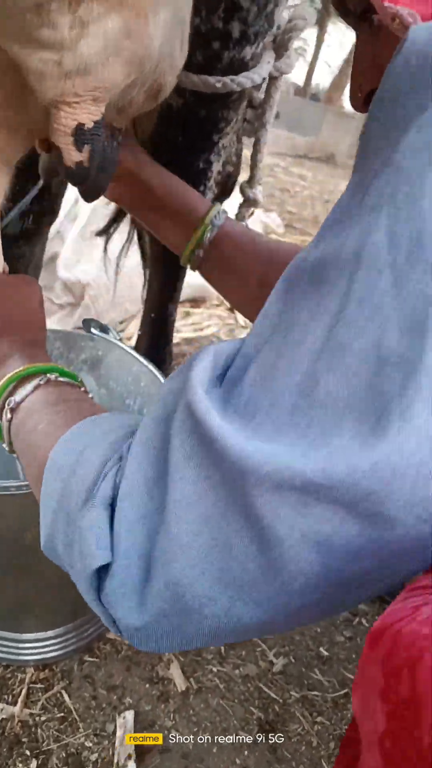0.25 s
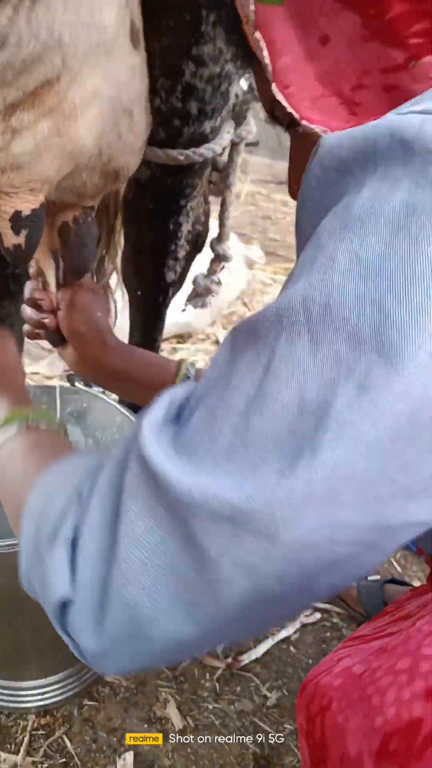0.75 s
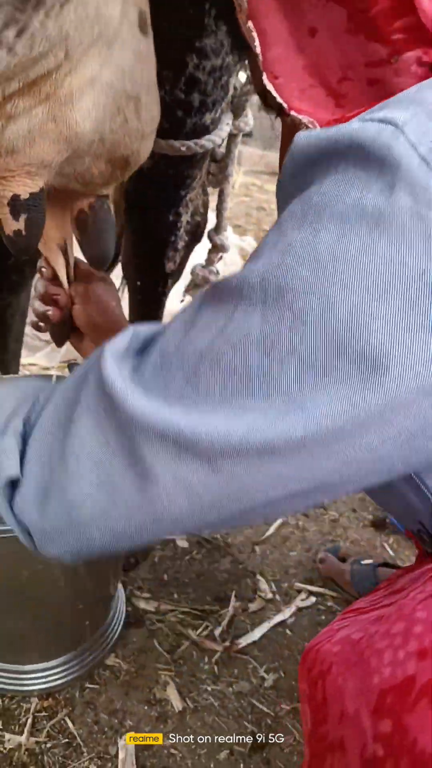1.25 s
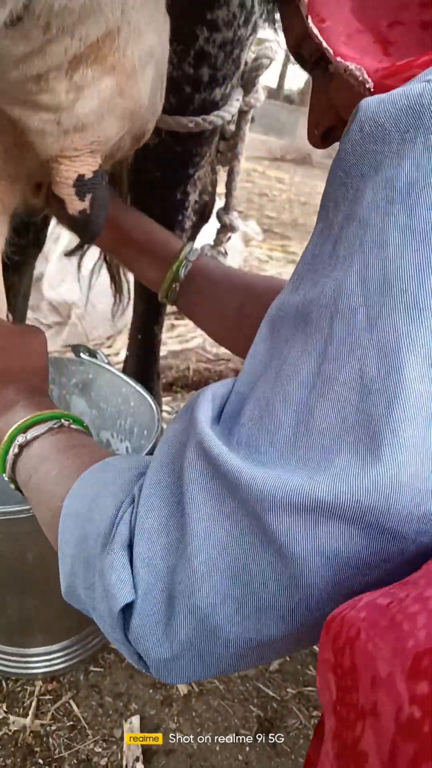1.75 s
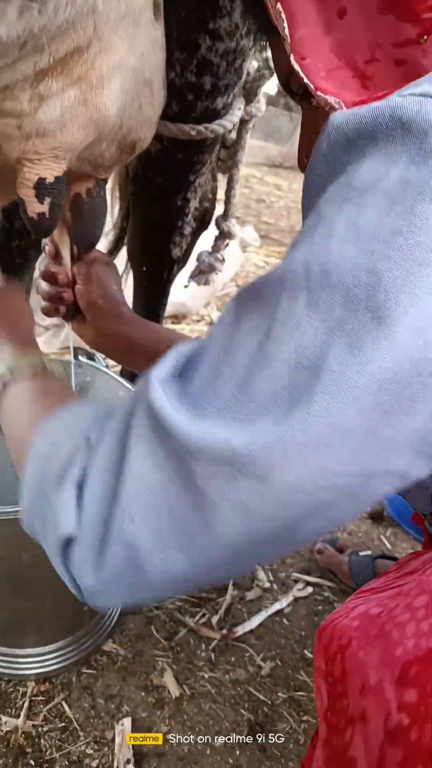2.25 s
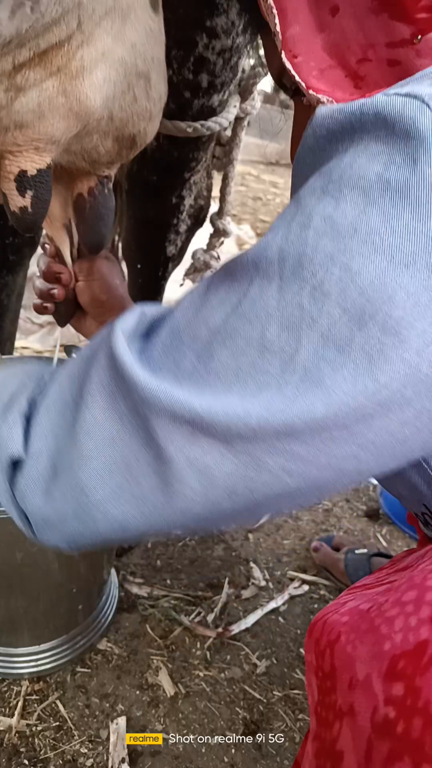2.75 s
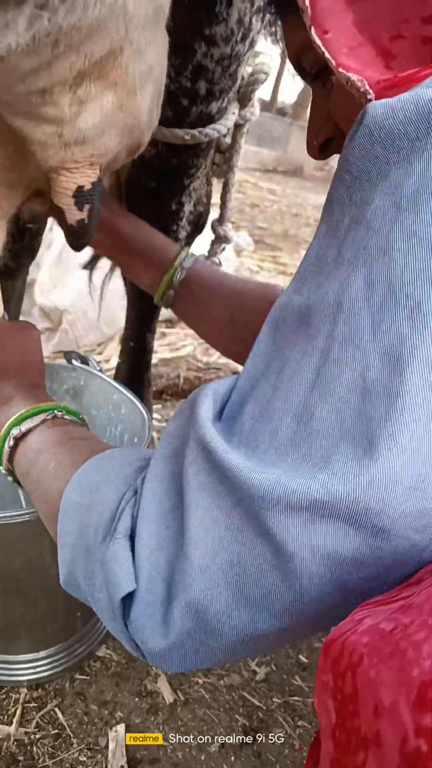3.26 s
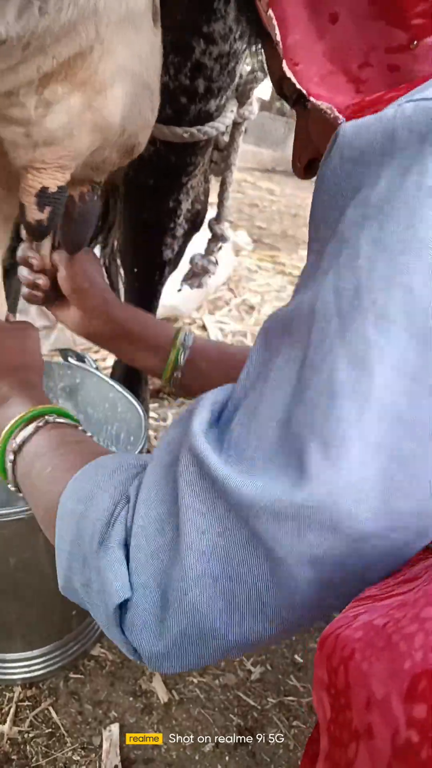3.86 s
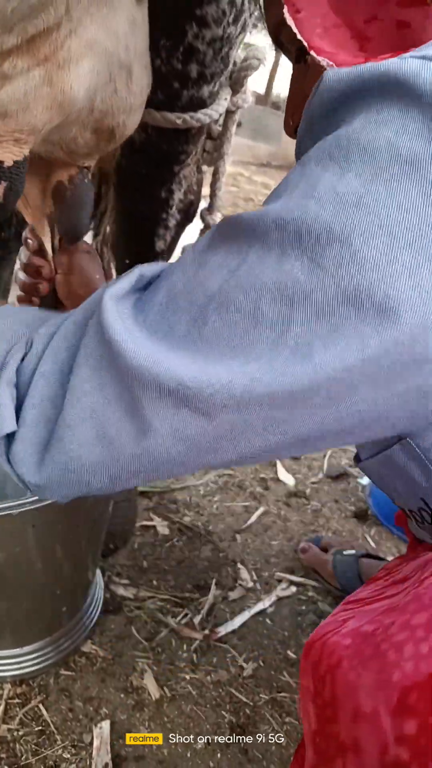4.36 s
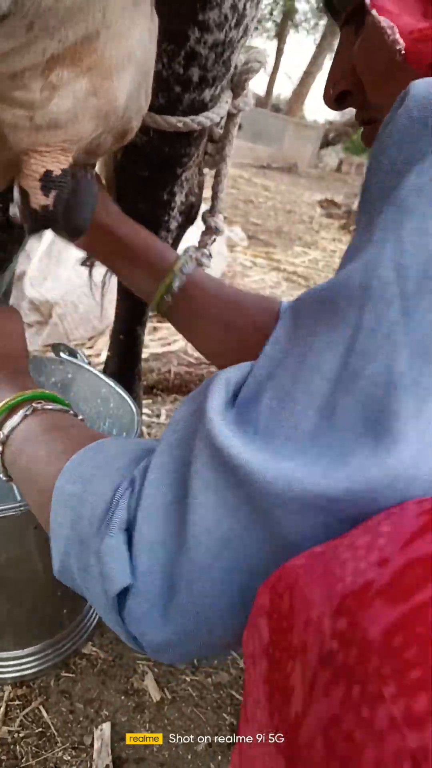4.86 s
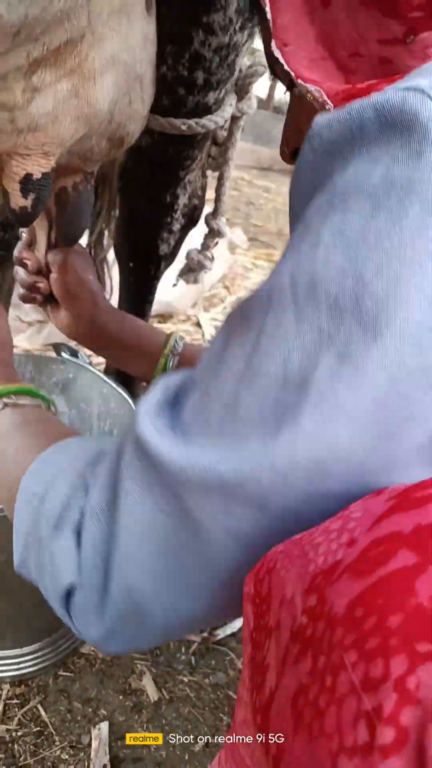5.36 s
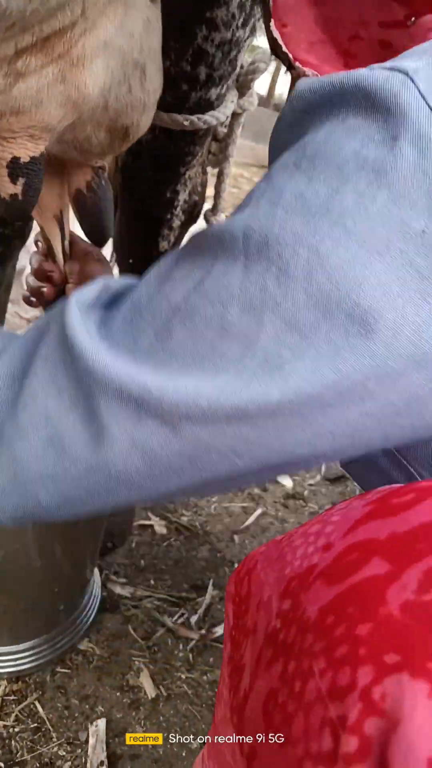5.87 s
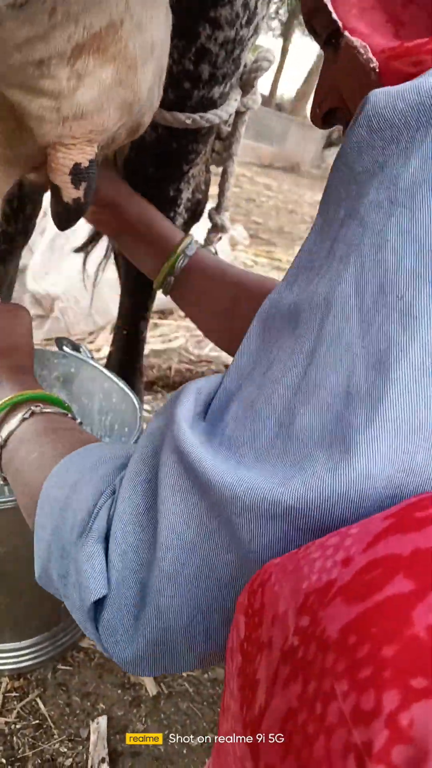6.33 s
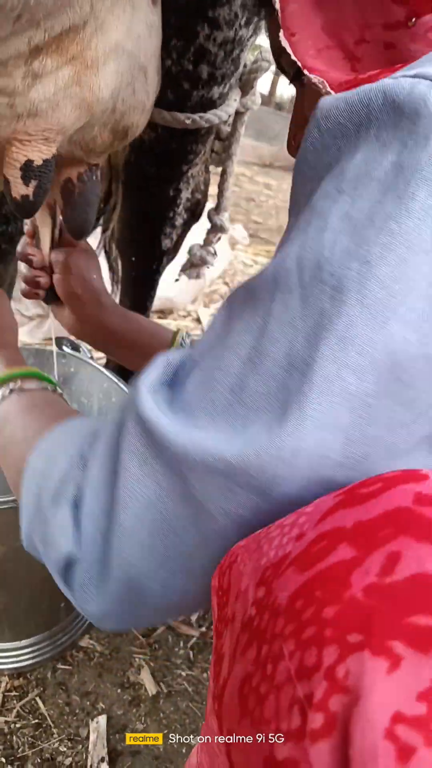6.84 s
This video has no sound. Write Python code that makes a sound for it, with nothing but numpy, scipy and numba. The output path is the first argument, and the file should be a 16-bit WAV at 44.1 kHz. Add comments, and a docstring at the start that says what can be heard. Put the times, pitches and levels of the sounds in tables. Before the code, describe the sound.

Hand milking up close: quick regular squirts plunge into frothy milk in a metal bucket, each a sharp hiss followed by wet, ringing bubbles.

```python
"""Jets of milk plunge into a part-filled steel pail as a cow is milked by hand, a slow and a quick hand in turn.
Each jet hisses on the froth (noise, fizzing and ticking bubbles), then drags air under (clouds of decaying sines).
Big bubbles gulp, single ones ring out, foam pockets sing; resonators and short echoes make the pail.
Behind it lie one soft low bump and the rumble of a quiet farmyard; a phone close by hears it all."""
import sys
import numpy as np
from scipy import signal
from scipy.fft import rfft, irfft
from scipy.io import wavfile
from scipy.ndimage import uniform_filter1d, minimum_filter1d, map_coordinates
from numba import njit

SR = 44100
rng = np.random.default_rng(int(sys.argv[2]) if len(sys.argv) > 2 else 0)


def master_out(mix):
    """Clip the mix to full scale and print it as 16-bit PCM to the path in sys.argv[1]."""
    frames = np.transpose(np.atleast_2d(mix))
    ceiling = np.clip(frames, -1, 1)
    pcm = np.round(ceiling * 32767).astype(np.int16)
    wavfile.write(sys.argv[1], SR, pcm)


N = 313110
T = np.arange(N) / SR

# Pulls of a teat, slow and quick hand in turn, each until the next. Each row: start in seconds,
# relative spray level in dB, grip time in seconds, relative fizz level in dB, fizz peak after start in seconds,
# stream level in dB, bubble pitch in Hz, pitch sag in octaves per second.
PULLS = [(-0.3, -55, 0.26, -36, 0.11, -26, 1455, 0.7), (0.076, -48.5, 0.25, -36, 0.11, -30.5, 2043, 1.3),
         (0.429, -46.5, 0.26, -33.5, 0.017, -21.5, 2172, 2.5),
         (0.83, -50.0, 0.16, -41, 0.14, -35.5, 1870, 0.5),
         (1.188, -47.5, 0.25, -40, 0.038, -26, 1914, -0.2),
         (1.588, -50.5, 0.1, -42, 0.088, -34.5, 1790, 1.1),
         (1.959, -46.5, 0.21, -43, 0.18, -27.5, 1950, 1.16),
         (2.352, -50.5, 0.19, -37.5, 0.15, -31.5, 1930, 1.5),
         (2.698, -46, 0.25, -36, 0.13, -25, 2130, 1.65), (3.088, -47, 0.17, -38, 0.2, -29.5, 1676, 0),
         (3.464, -46, 0.19, -38.5, 0.055, -23, 1733, 1.53),
         (3.86, -49.5, 0.15, -37.0, 0.16, -32, 1923, 3.05),
         (4.228, -44.5, 0.23, -37.5, 0.086, -24, 1834, 1.36),
         (4.638, -50.5, 0.15, -40.5, 0.13, -33.5, 1940, 0.9),
         (5.006, -48, 0.12, -43, 0.094, -33.5, 1645, 0), (5.41, -52.5, 0.24, -43.5, 0.17, -34, 1695, -0.25),
         (5.78, -51, 0.37, -40, 0.15, -32, 1920, 2), (6.173, -52.5, 0.14, -38.5, 0.05, -34, 1690, -0.6),
         (6.542, -48.5, 0.23, -38.5, 0.13, -27.5, 2074, 2),
         (6.931, -52.5, 0.2, -40.5, 0.14, -31.5, 1930, 1.2)]
# Colour of foam fizz. Each row: frequency in Hz, gain in dB.
FIZZ_COLOUR = [(60, -67), (300, -61), (1000, -25), (2400, 9.5), (2900, 10), (4000, 5), (6000, 0.5),
               (7500, -4), (12000, -28)]
# Colour of jet spray. Each row: frequency in Hz, gain in dB.
SPRAY_COLOUR = [(60, -35), (300, -17), (1500, -9.5), (5000, 5), (7600, -1), (9000, 1), (10500, -5.5),
                (12500, -5), (16000, -8.5)]


def plunge(now, plunge_gain_db=-.5, clump_db=2.5, clump_per_s=240, surge_db=1, surge_per_s=45):
    """The stream bubbles, sagging in pitch as it slows; plunges drag air under, adding swells of bubbles."""
    # Stream peak after the pull starts, in seconds: slow hand, quick hand.
    stream_peak_s = (0.28, 0.29)
    # Stream rise in dB per second: slow hand, quick hand.
    stream_rise_db_per_s = (32.5, 17)
    # Stream fall in dB per second: slow hand, quick hand.
    stream_fall_db_per_s = (160, 86)
    # Jets breaking through the froth. Each row: middle in seconds, relative level in dB,
    # length in seconds, bubble pitch in Hz.
    plunges = [(0.21, -13, 0.038, 2045), (0.297, -22.5, 0.034, 2034), (0.645, -21, 0.017, 2070.0),
               (0.776, -22.5, 0.079, 1513), (0.942, -18, 0.028, 1980), (0.995, -16, 0.019, 1555),
               (1.064, -27.5, 0.036, 1193), (1.268, -21, 0.014, 2114), (1.357, -21.5, 0.026, 2010),
               (1.42, -24, 0.037, 1620), (1.574, -28, 0.034, 1320), (1.701, -13.5, 0.045, 2030),
               (2.096, -26.5, 0.085, 1934), (2.163, -18, 0.035, 1756), (2.354, -31, 0.0081, 2040),
               (2.488, -21, 0.051, 1850), (2.78, -22.5, 0.017, 1976), (2.912, -22.5, 0.056, 1340),
               (3.066, -28, 0.042, 1360), (3.251, -20.5, 0.089, 1706), (3.561, -20, 0.017, 2140),
               (3.704, -20.5, 0.053, 2010.0), (3.978, -16, 0.037, 1835), (4.021, -18.5, 0.016, 2270),
               (4.448, -18.5, 0.045, 1732), (4.761, -16, 0.031, 1900), (4.827, -26.5, 0.04, 2110),
               (5.09, -21.5, 0.059, 1566), (5.195, -18, 0.052, 1587), (5.408, -36, 0.022, 1910),
               (5.526, -21, 0.049, 1903), (5.86, -21, 0.015, 2034), (5.953, -26.5, 0.08, 1926),
               (6.133, -29, 0.054, 1684), (6.3, -17.5, 0.04, 1827), (6.593, -28, 0.024, 1770),
               (6.729, -24.5, 0.063, 1600), (7.064, -16, 0.047, 1840)]
    # Colour of plunge bubbles. Each row: frequency in Hz, gain in dB.
    plunge_colour = [(60, -59), (200, -57), (500, -13.5), (730, -13.5), (880, 2), (1300, -3), (1800, -2),
                     (2330, -3), (2550, -9), (3200, -5.5), (5000, -32), (12000, -51)]
    sag_after_s, plunge_sag_octaves_per_s, plunge_sag_s = 0.095, 3.26, 0.065

    age, hand = now["age"], now["hand"]
    since_peak_s = age - np.take(stream_peak_s, hand)
    stream_db = now["stream_db"] + swell(since_peak_s, hand, stream_rise_db_per_s, stream_fall_db_per_s)
    stream_hz = now["hz"] * 2 ** (-now["sag"] * np.maximum(age - sag_after_s, 0))
    parts = [(catching(stream_db), stream_hz)]
    for middle_s, db, length_s, hz in plunges:
        shape = np.exp(1 - np.sqrt(1 + (2 * (T - middle_s) / length_s) ** 2))
        # pitch falls as the hole deepens
        sag = np.exp2(-plunge_sag_octaves_per_s * np.clip(T - middle_s, -plunge_sag_s, plunge_sag_s))
        parts.append((amp(db + plunge_gain_db) * shape, hz * sag))
    strength, pitch_hz = blend(parts)
    bubbles = cloud(pitch_hz, per_s=2600, octaves=0.3166, cycles=47.4, scatter_db=3.0, glide=0.077, pinch=0.18)
    clumps = amp(clump_db * walk(clump_per_s))
    shaped = even(pail(colour(bubbles * clumps, plunge_colour)), span_s=0.031)
    surge = amp(surge_db * walk(surge_per_s))
    return shaped * strength * catching(running_dry()) * surge


def spray(now, gain_db=4.0, sputter_db=2, sputter_per_s=120, patter_db=4.0,
          strike_db=16.5, strike_s=0.0077, surge_db=3.0, surge_per_s=30):
    """Jet droplets patter on the foam as spiky noise; the head strikes hardest, easing grip fades it."""
    head_db = strike_db * np.exp(-now["age"] / strike_s)
    level_db = now["spray_db"] + head_db + easing(now) + surge_db * walk(surge_per_s)
    patter = amp(patter_db * np.minimum(rng.exponential(size=N), 6))
    coloured = pail(colour(rng.standard_normal(N) * patter, SPRAY_COLOUR))
    shaped = hollows(coloured, depth_db=6.0, per_octave=21, per_s=36, sink_octaves_per_s=0.2)
    sputter = amp(gain_db + sputter_db * walk(sputter_per_s))
    return even(shaped, span_s=0.063) * catching(level_db) * sputter


def droplets(now, per_s=140, gain_db=1, scatter_db=4, decay_s=0.0012):
    """Stray drops tick on froth and wall as short noise decays, fading once the grip eases."""
    # Colour of stray drops. Each row: frequency in Hz, gain in dB.
    droplet_colour = [(200, -37), (1500, -7), (3000, -0.5), (5500, -2), (9000, -9.5), (16000, -20)]
    wait, size = rng.exponential(size=(3000, 2)).T
    at = (np.cumsum(wait) / per_s * SR).astype(int)
    inside = at < N
    hits = np.bincount(at[inside], amp(scatter_db * np.minimum(size[inside], 3)), N)
    decays = signal.lfilter([1], [1, -np.exp(-1 / (decay_s * SR))], hits)
    ticks = decays * rng.standard_normal(N)
    level = catching(now["spray_db"] + easing(now) + gain_db)
    return unit(pail(colour(ticks, droplet_colour))) * level


def spits(gain_db=-2, mist_db=-12):
    """Slugs of milk smack on the foam: decaying bursts of fizz-coloured noise with fine mist above."""
    # Spits of the jet, at any moment of a pull. Each row: start in seconds, relative level in dB,
    # decay in seconds.
    spit_rows = [(0.446, -24, .004), (.499, -32, .005), (.525, -24.5, 0.013), (1.19, -23.5, 0.011),
                 (1.266, -24, 0.023), (2.775, -29, .02), (2.798, -25, 0.014), (2.835, -39, 0.012),
                 (3.156, -33, 0.0039), (3.188, -21, 0.0086), (3.273, -26, 0.018), (3.529, -25, 0.0088),
                 (4.232, -27, 0.0054), (4.317, -23.5, 0.023), (4.397, -23, .004), (4.502, -24, 0.015),
                 (4.706, -42, 0.0064), (5.05, -39, .007), (5.103, -31, 0.014), (5.19, -29, 0.046),
                 (5.474, -31, .015), (5.842, -27, .01), (5.852, -21, 0.015), (5.883, -27, .008),
                 (6.235, -28, 0.0078), (6.297, -28, 0.017), (6.627, -30, 0.01), (7.026, -31, 0.014)]
    bursts = np.zeros(N)
    for start_s, db, decay_s in spit_rows:
        first = int(start_s * SR)
        bursts[first:] += amp(db + gain_db) * np.exp(-np.minimum(T[:N - first] / decay_s, 20))
    smack = unit(pail(colour(rng.standard_normal(N), FIZZ_COLOUR)))
    mist = unit(pail(colour(rng.standard_normal(N), SPRAY_COLOUR)))
    return (smack + amp(mist_db) * mist) * bursts


def fizz(now, gain_db=3.5, lasting_db=-5, crackle_db=-3, sputter_db=4.5, sputter_per_s=150):
    """Droplets burst the foam and set tiny bubbles ringing, over a steady soft fizz."""
    # Fizz rise in dB per second: slow hand, quick hand.
    rise_db_per_s = (47, 58)
    # Fizz fall in dB per second: slow hand, quick hand.
    fall_db_per_s = (73, 65)
    foam_db = -53.5  # floor between pulls
    level_db = now["fizz_db"] + swell(now["age"] - now["fizz_s"], now["hand"], rise_db_per_s, fall_db_per_s)
    tiny = cloud(3693, per_s=3000, octaves=0.546, cycles=56, scatter_db=2, glide=0.022, pinch=36)
    # bubbles held in the foam ring longer; bursting ones only tick
    lasting = cloud(3800, per_s=970, octaves=.45, cycles=116, scatter_db=6.5, glide=-0.0091, pinch=28)
    crackle = cloud(4610, per_s=2500, octaves=0.82, cycles=10.0, scatter_db=9.0, glide=0, pinch=0.33)
    foam = unit(tiny) + amp(lasting_db) * unit(lasting) + amp(crackle_db) * unit(crackle)
    coloured = pail(colour(foam, FIZZ_COLOUR))
    shaped = hollows(coloured, depth_db=7.0, per_octave=10, per_s=14, sink_octaves_per_s=1.5)
    sputter = amp(gain_db + sputter_db * walk(sputter_per_s))
    driven = catching(level_db + running_dry()) * sputter
    return even(shaped, span_s=0.029) * np.hypot(driven, amp(foam_db))


def gulps(gain_db=-0.5, slosh_db=-9, lap_db=3.0, lap_per_s=30):
    """Holes in the milk close on large air pockets, low bubbles over sloshing noise; the pail rings with both."""
    # Closing holes. Each row: peak in seconds, relative level in dB, decay in seconds, pitch in Hz.
    gulp_rows = [(0.001, -36.5, 0.052, 460), (0.256, -36, 0.13, 426), (0.552, -37, 0.071, 426),
                 (0.846, -38, 0.07, 548), (0.974, -38.5, 0.047, 434), (1.037, -34.0, 0.051, 505),
                 (1.087, -34, 0.034, 515), (1.258, -39, 0.0059, 490.0), (1.315, -40, 0.092, 456),
                 (1.45, -37, 0.012, 590), (1.627, -39.5, 0.085, 480), (1.764, -38, 0.23, 458),
                 (1.837, -37.5, 0.12, 450), (2.062, -37, 0.17, 495), (2.219, -39.5, 0.011, 510.0),
                 (2.545, -32.5, 0.16, 413), (2.821, -40.5, 0.062, 454), (3.026, -34.5, 0.15, 423),
                 (3.195, -30.5, 0.018, 567), (3.325, -31.0, 0.025, 454), (3.46, -36.5, 0.034, 468),
                 (3.574, -38.5, 0.014, 420.0), (3.614, -36, 0.072, 440), (3.799, -36.5, 0.24, 470.0),
                 (4.029, -32.5, 0.096, 445), (4.517, -32, 0.07, 466), (4.801, -32.5, 0.17, 547),
                 (4.944, -35.5, 0.075, 455), (5.068, -30.5, 0.035, 470), (5.23, -31, 0.035, 536),
                 (5.312, -31.5, 0.04, 510.0), (5.593, -32.5, 0.2, 423), (5.725, -33.5, 0.057, 400),
                 (5.879, -38, 0.075, 424), (6.015, -31, 0.12, 463), (6.335, -33, 0.069, 477),
                 (6.371, -29.5, 0.074, 437), (6.481, -41.5, 0.19, 422), (6.629, -43.5, 0.057, 423),
                 (6.804, -46, 0.022, 570.0), (6.868, -38, 0.076, 495)]
    # Colour of gulps and slosh. Each row: frequency in Hz, gain in dB.
    gulp_colour = [(40, -76), (100, -11), (190, -10.5), (260, -8), (360, -5), (580, 5), (720, -7),
                   (1100, 6.5), (3000, -64)]
    attack_s, sway_db, sway_hz = 0.021, -54, 427
    fade_power = 0.96  # 1 = exponential
    parts = [(amp(sway_db), sway_hz)]
    for peak_s, db, decay_s, hz in gulp_rows:
        attack = np.clip((peak_s - T) / attack_s, 0, 20)
        fade = np.clip((T - peak_s) / decay_s, 0, 20) ** fade_power
        parts.append((amp(db) * np.exp(-attack - fade), hz))
    strength, pitch_hz = blend(parts)
    bubbles = cloud(pitch_hz, per_s=480, octaves=0.38, cycles=16.6, scatter_db=5.0, glide=0.23, pinch=0.55)
    slosh = unit(colour(rng.standard_normal(N), gulp_colour)) * amp(slosh_db)
    shaped = even(pail(unit(colour(bubbles, gulp_colour)) + slosh), span_s=0.023)
    return shaped * strength * amp(gain_db + lap_db * walk(lap_per_s))


def pockets(gain_db=-1, waver=0.025, waver_per_s=420, flicker_db=3, flicker_per_s=110):
    """Hollows in the foam sing with a rough, gliding tone as they change size."""
    # Singing hollows. Each row: start in seconds, end in seconds, start pitch in Hz, end pitch in Hz,
    # relative level in dB.
    pocket_rows = [(0, 0.218, 4280, 3950, -46.5), (.905, 0.954, 1790, 2110, -23),
                   (.98, 1.092, 3440, 3050, -36.5), (1.68, 1.772, 5700, 5240, -42),
                   (1.755, 1.951, 4370, 3920, -47.5), (2.005, 2.107, 2560, 2370, -32),
                   (2.5, 2.62, 3700, 3030, -40), (3.33, 3.417, 3970, 4360, -36),
                   (4.02, 4.087, 3950, 3430, -40), (4.075, 4.18, 2026, 2180, -30.5),
                   (5.635, 5.825, 4300, 4150, -53), (5.668, 5.736, 1690, 1800, -34.5),
                   (5.87, 6.106, 3720, 3375, -42), (6.15, 6.298, 2700, 2763, -38)]
    out = np.zeros(N)
    wobble = 1 + waver * walk(waver_per_s)
    flicker = amp(flicker_db * walk(flicker_per_s))
    for start_s, end_s, first_hz, last_hz, db in pocket_rows:
        age = np.clip((T - start_s) / (end_s - start_s), 0, 1)
        hz = (first_hz + (last_hz - first_hz) * age) * wobble
        phase = 2 * np.pi * np.cumsum(hz) / SR
        out += amp(db + gain_db) * np.sin(np.pi * age) * np.sin(phase)
    return np.sqrt(2) * out * flicker


def plops(cycles=36, glide=0.12, pinch=3.8, gain_db=-3):
    """Single loud bubbles ring out over the rest, rising in pitch."""
    # Single bubbles. Each row: start in seconds, relative level in dB, pitch in Hz.
    plop_rows = [(.167, -19, 2140), (.188, -3.5, 2260), (.202, -18, 2230), (.224, -11, 2140),
                 (.643, -5, 2010), (0.907, -4.5, 1705), (.938, -3, 2170), (0.997, -5.5, 1790),
                 (1.195, -7, 3580), (1.269, -9.5, 2060), (1.307, -10.5, 3430), (1.701, 1.5, 2100),
                 (2.15, -14, 1740), (2.166, -1.5, 1920), (2.475, -5.5, 1390), (2.515, -7, 2050),
                 (2.553, -23, 366), (3.189, -10, 3450), (3.235, -0.5, 1820), (3.528, -11.5, 1680),
                 (3.905, -13, 2090), (3.961, -1, 1527), (3.969, -7, 1670), (4.397, -13, 1950),
                 (4.449, -5.5, 1540), (4.706, -16, 1380), (4.779, -6, 1930), (5.228, -16.5, 882),
                 (5.598, -27.5, 400), (5.652, -21, 366), (5.853, -6, 1960), (6.299, -9, 1940),
                 (6.4, -29.5, 373), (6.625, -16, 1560), (7.026, -8.5, 2450), (7.045, -9, 2110)]
    start_s, db, hz = np.array(plop_rows, float).T.copy()
    lives = np.full(len(start_s), float(cycles))
    return pail(ring(start_s, hz, lives, amp(db + gain_db), float(glide), float(pinch)))


def pull():
    """Per sample: hand at work, time since its pull began, and the other columns of that pull."""
    rows = np.array(PULLS, float)
    index = np.maximum(np.searchsorted(rows[:, 0], T, "right") - 1, 0)
    start_s, *columns = rows[index].T
    names = "spray_db hold_s fizz_db fizz_s stream_db hz sag".split()
    return dict(zip(names, columns), hand=index % 2, age=T - start_s)


def easing(now):
    """Drop of the jet in dB once the grip lets go."""
    # Spray fall in dB per second: slow hand, quick hand.
    fall_db_per_s = (107, 76)
    return -np.take(fall_db_per_s, now["hand"]) * np.maximum(now["age"] - now["hold_s"], 0)


def running_dry(dry_s=0.044, dry_db=-6):
    """Drop in dB as the teat empties just before the other hand starts."""
    starts_s = np.array(PULLS, float)[:, 0]
    next_s = np.append(starts_s, np.inf)[np.searchsorted(starts_s, T, "right")]
    return dry_db * np.maximum(1 - (next_s - T) / dry_s, 0)


def swell(since_peak_s, hand, rise_db_per_s, fall_db_per_s):
    """Level in dB below a peak: steady rise, then steady fall, at the pace of the hand at work."""
    rise_db = np.take(rise_db_per_s, hand) * since_peak_s
    fall_db = -np.take(fall_db_per_s, hand) * since_peak_s
    return np.minimum(rise_db, fall_db)


def catching(level_db, catch_s=0.018):
    """Gain following a level in dB, smoothed so that a new jet takes a moment to build up."""
    size = int(catch_s * SR)
    return uniform_filter1d(uniform_filter1d(amp(level_db), size), size // 2)


def blend(parts):
    """Joint strength and power-weighted mean pitch of several (gain, pitch in Hz) parts."""
    power = sum(gain ** 2 for gain, _ in parts) + 1e-18
    pitch_hz = sum(gain ** 2 * hz for gain, hz in parts) / power + 1e-9
    return np.sqrt(power), pitch_hz


@njit
def ring(start_s, hz, cycles, size, glide, pinch):
    """Bubbles: sines swelling over `pinch` cycles, rising by the fraction `glide`, dying 60 dB in `cycles`."""
    out = np.zeros(N)
    for k in range(len(start_s)):
        first, length = int(start_s[k] * SR), int(cycles[k] * SR / hz[k])
        for i in range(max(0, -first), min(length, N - first)):
            age, turns = i / length, i * hz[k] / SR
            envelope = (1 - np.exp(-turns / pinch)) * np.exp(-6.9 * age)
            out[first + i] += size[k] * envelope * np.sin(2 * np.pi * turns * (1 + glide * age / 2))
    return out


def cloud(hz, per_s, octaves, cycles, scatter_db, glide, pinch):
    """Bubbles born at random, scattered in pitch, size and damping around a pitch (number or curve)."""
    count = 30000
    birth_s = np.cumsum(rng.exponential(size=count)) / per_s
    inside = birth_s < T[-1]
    pitch, life, size = np.clip(rng.standard_normal((count, 3)), -1.75, 2.3)[inside].T
    birth_s = birth_s[inside]
    centre_hz = np.interp(birth_s, T, hz * np.ones(N))
    pitches_hz = np.clip(centre_hz * 2 ** (octaves * pitch), 100, .4 * SR)
    # small bubbles die sooner but start louder, so all carry a like energy
    sizes = amp(scatter_db * size) * np.sqrt(pitches_hz / centre_hz)
    return ring(birth_s, pitches_hz, cycles * 2 ** (.5 * life), sizes, float(glide), float(pinch))


def hollows(x, depth_db, per_octave, per_s, sink_octaves_per_s):
    """Hollows open and widen in the foam: passing peaks and dips that slide down the spectrum."""
    size = 512
    hz, s, frames = signal.stft(x, SR, nperseg=size)
    place = (np.log2(1 + hz[:, None] / 100) + sink_octaves_per_s * s) * per_octave
    chance = rng.standard_normal((256, 256))
    ripple = map_coordinates(chance, np.broadcast_arrays(place, s * per_s), order=3, mode="wrap")
    return signal.istft(frames * amp(depth_db * ripple), SR, nperseg=size)[1][:N]


def pail(x, direct=0.93):
    """Air and wall of the pail ring as parallel resonators beside the direct sound."""
    # Pail resonances. Each row: frequency in Hz, width in Hz, gain in dB.
    resonances = [(407.6, 63, 9), (605, 270, -23), (914, 270, 5.5), (1218, 180, 2), (1305, 36, 0),
                  (1698, 147, 1), (2020, 140, -8.5), (2167, 465, 7.5), (3354, 240, 2), (3760, 130, 5.5),
                  (4600, 100, -21), (5600, 340, -7), (6440, 21, -21)]
    return direct * x + sum(amp(db) * resonance(x, hz, width_hz) for hz, width_hz, db in resonances)


def flutter(x, echo_db=-4, echo_t60_s=0.054):
    """Short echoes between the steel walls; the paths keep changing as jets, arms and milk move."""
    hop = 2048
    t = T[:2 * hop]
    decay = amp(-60 * t / echo_t60_s) * (t > .001)
    window = np.sin(np.pi * np.arange(len(t)) / len(t))
    padded, echoes = np.pad(x, (hop, 2 * hop)), np.zeros(N + 6 * hop)
    for i in range(0, N + hop, hop):
        path = rng.standard_normal(len(t)) * decay
        piece = padded[i:i + len(t)] * window
        echoes[i:i + 2 * len(t) - 1] += signal.fftconvolve(piece, path / np.linalg.norm(path))
    return (x + amp(echo_db) * echoes[hop:hop + N]) / np.hypot(1, amp(echo_db))


def amp(db):
    """Decibels to gain."""
    return 10 ** (np.asarray(db) / 20)


def unit(x):
    """Scale to rms 1."""
    return x / np.sqrt(np.mean(x ** 2))


def even(x, span_s):
    """Level to a running rms near 1, smoothed twice over span_s; quicker flutter stays."""
    size = int(span_s * SR)
    power = uniform_filter1d(uniform_filter1d(x ** 2, size), size)
    return x / np.sqrt(np.abs(power) + 1e-18)


def walk(per_s):
    """Smooth chance: random levels joined by splines, spread near 1."""
    knots = rng.standard_normal(4096)
    return map_coordinates(knots, [T * per_s], order=3, mode="wrap")


def colour(x, points):
    """Causal filter through (Hz, dB) points, built from the cepstrum."""
    size = 4096
    hz, db = np.transpose(points)
    grid_hz = np.maximum(np.fft.rfftfreq(size, 1 / SR), 1)
    gain = amp(np.interp(np.log(grid_hz), np.log(np.sort(hz)), db))
    cepstrum = irfft(np.log(gain))
    # fold to minimum phase
    cepstrum[1:size // 2] *= 2
    cepstrum[size // 2 + 1:] = 0
    return signal.fftconvolve(x, irfft(np.exp(rfft(cepstrum))))[:N]


def resonance(x, hz, width_hz):
    """Two-pole band-pass, gain 1 at the centre."""
    return signal.lfilter(*signal.iirpeak(hz, hz / width_hz, fs=SR), x)


def limit(x, ceiling=.8, size=220):
    """Turn the gain down for a moment around peaks that would overload the phone."""
    gain = ceiling / np.maximum(np.abs(x), ceiling)
    return x * uniform_filter1d(minimum_filter1d(gain, 2 * size), size)


def bump(at_s=5.975, hz=95, peak_db=-49, width_s=.022):
    """One soft low bump: a sine under a bell-shaped envelope."""
    return amp(peak_db) * np.sin(2 * np.pi * hz * T) * np.exp(-((T - at_s) / width_s) ** 2)


def yard(level_db=-56):
    """Faint open-air rumble: steady coloured noise."""
    # Colour of the far yard. Each row: frequency in Hz, density in dB per Hz.
    yard_colour = [(20, -11), (45, -12), (100, -1), (180, -1), (400, 0), (1000, 3), (4000, -7.5),
                   (16000, -34)]
    return unit(colour(rng.standard_normal(N), yard_colour)) * amp(level_db)


def scene():
    """Everything that sounds in the pail, over the bump and the yard."""
    now = pull()
    jets = spray(now) + droplets(now) + spits()
    bubbles = plunge(now) + gulps() + plops()
    foam = fizz(now) + pockets()
    return (flutter(jets + bubbles + foam) + bump() + yard())[None]


def record(dry, port_hz=15400, port_width_hz=1400, port_db=17, low_cut_hz=70, top_hz=15750):
    """The microphone port rings in the top treble; the phone cuts deep bass, limits peaks, cuts the very top."""
    port = resonance(resonance(dry, port_hz, port_width_hz), port_hz, port_width_hz)
    coloured = dry + amp(port_db) * port
    thinned = signal.sosfilt(signal.butter(2, low_cut_hz, "high", fs=SR, output="sos"), coloured)
    return signal.sosfilt(signal.ellip(12, .2, 90, top_hz, fs=SR, output="sos"), limit(thinned))


dry = scene()
out = record(dry)
master_out(out)
```